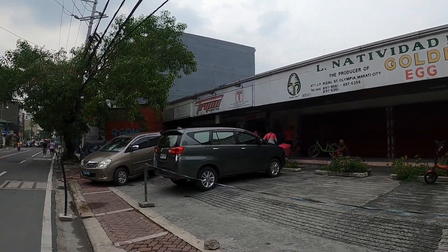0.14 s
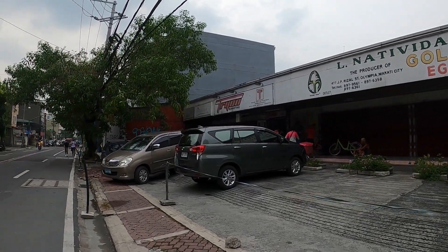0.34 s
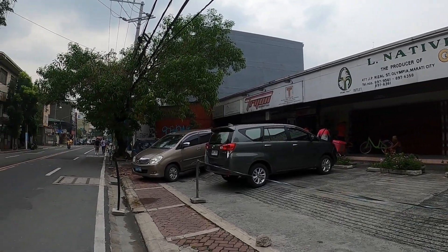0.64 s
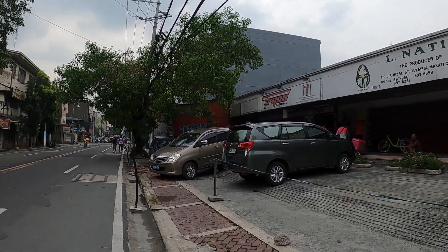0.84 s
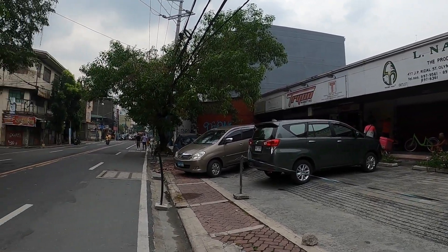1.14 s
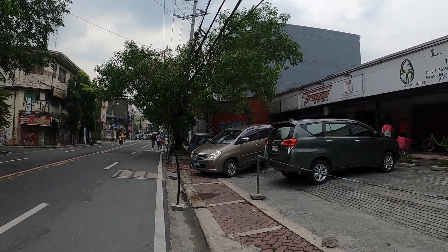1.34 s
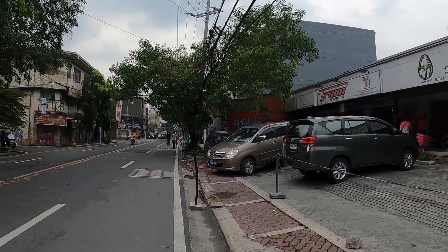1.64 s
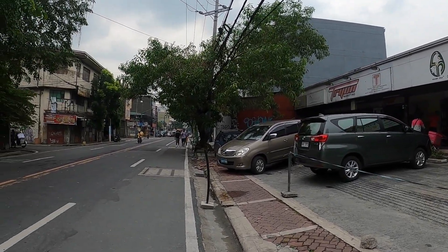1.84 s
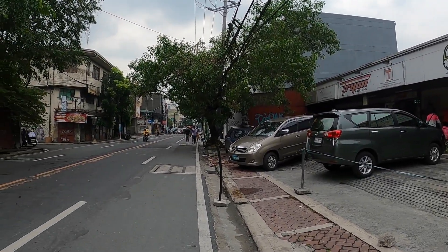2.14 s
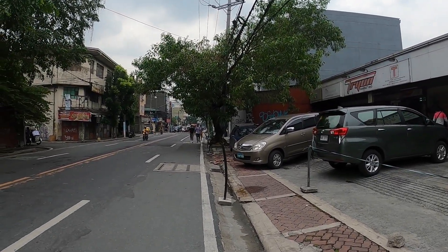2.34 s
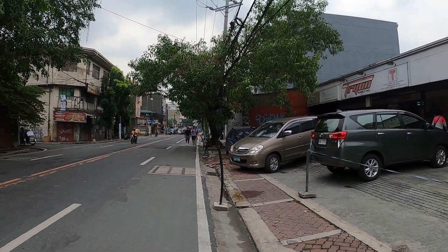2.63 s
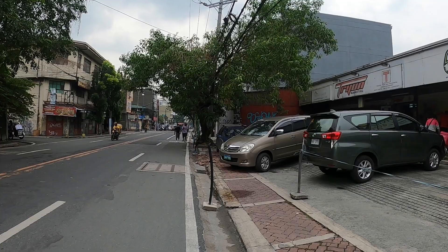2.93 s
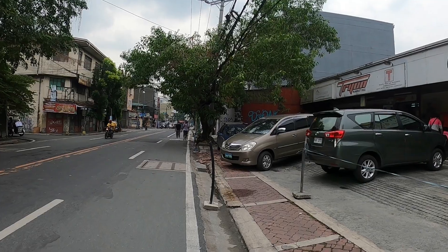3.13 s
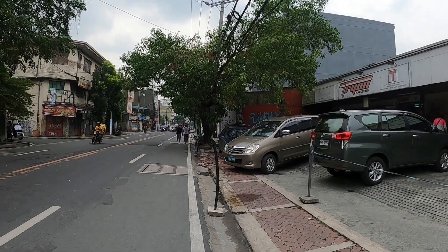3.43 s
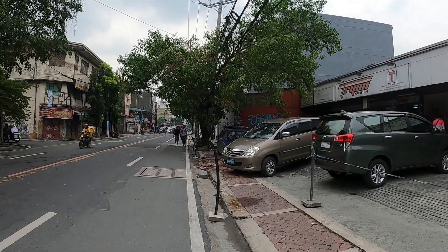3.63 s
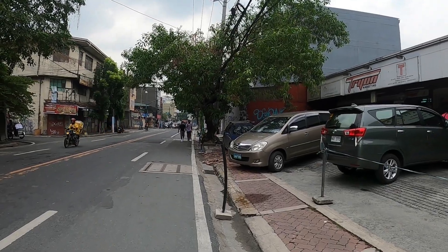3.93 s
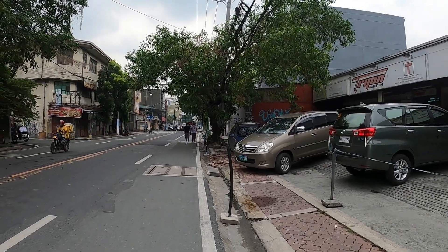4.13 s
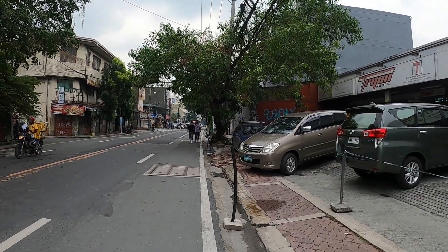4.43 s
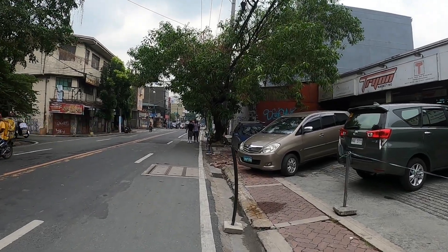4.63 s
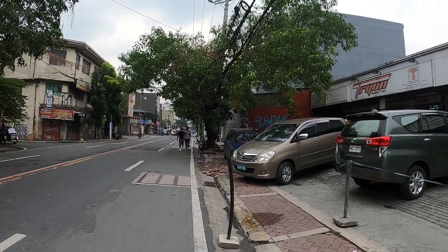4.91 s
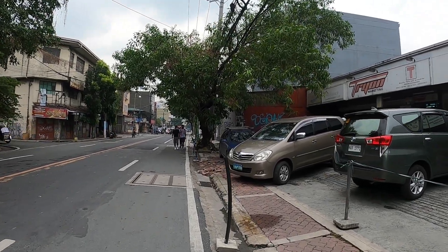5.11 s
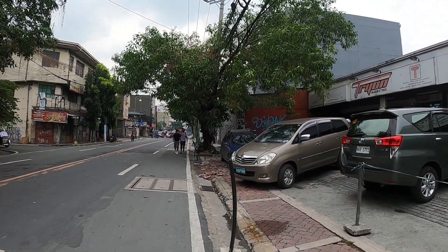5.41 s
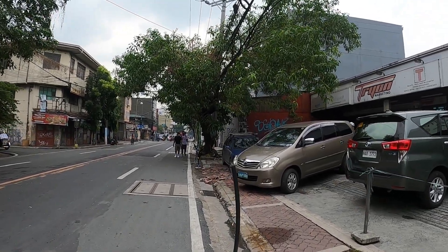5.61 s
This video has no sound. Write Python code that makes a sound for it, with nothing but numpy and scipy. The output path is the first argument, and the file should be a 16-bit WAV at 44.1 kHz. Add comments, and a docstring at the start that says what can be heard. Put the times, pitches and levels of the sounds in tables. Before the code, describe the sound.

Dull handling thumps from a walker's steps over deep low rumble, with faint distant traffic and a thin ticking motorbike hiss on the right.

```python
"""Street walk with a hand-held camera

A walker carries a small camera along a street: each footfall jolts the grip, a sagging swing that thumps
dully in the microphone. Close by lies deep rumble with the drone of the hand on the grip, and far off the
wash of tyres, both shaped noise and alike on both sides. On the right only, a thin high hiss pulses with a
motorbike's firing and swells as it passes, with chain clatter and ringing ticks of loose parts."""
import sys
import numpy as np
from scipy.fft import rfft, irfft, next_fast_len
from scipy.io import wavfile
from scipy.ndimage import uniform_filter1d, map_coordinates

SR = 44100
rng = np.random.default_rng(int(sys.argv[2]) if len(sys.argv) > 2 else 0)


def unload_audio(sound):
    """Save the sound as a 16-bit wav file, at the path given as the first command line argument."""
    columns = np.transpose(np.atleast_2d(sound))
    # keep every value between -1 and 1, then stretch to whole-number steps
    steps = np.round(np.clip(columns, -1, 1) * 32767)
    wavfile.write(sys.argv[1], SR, steps.astype(np.int16))


N = 254192

# Footfall jolts of the grip: t/s of the peak, level/dB of the peak, f/Hz at the peak, rise/cycles,
# level/dB of the arm's recoil against the jolt
JOLTS = [(0.16, -34.5, 168, 0.25, -22), (0.663, -34, 141, 0.47, -14), (0.919, -37.5, 156, 0.38, -17),
         (.955, -40.5, 160, 0.34, 0), (1.158, -44, 131, 0.58, -18), (1.477, -28.5, 160, .33, -12.5),
         (1.899, -20.5, 162, 0.35, -19.5), (1.994, -43.5, 88.5, 0.54, -12), (2.375, -25.5, 124, 0.43, -9.5),
         (2.394, -35, 109, .49, -18), (2.733, -28.5, 164, 0.23, -16), (2.744, -35, 101, .34, -11),
         (3.212, -39.5, 177, 0.18, -22), (3.634, -43.5, 117, 0.37, -3), (3.774, -44.5, 172, 0.46, -17),
         (3.861, -17.5, 163, 0.36, -19), (4.121, -39, 111, .71, -6), (4.133, -26, 186, 0.77, -10),
         (4.151, -27.5, 149, 0.59, -22), (4.554, -27.5, 166, 0.33, -7.5), (4.878, -44, 95, 0.44, -7),
         (5.604, -39, 87, 0.97, -24)]


def amp(db):
    """dB to gain."""
    return 10 ** (np.asarray(db) / 20)


def unit(x):
    """Scaled to rms 1."""
    return x / np.sqrt(np.mean(x ** 2) + 1e-20)


def curves(rows):
    """One value per sample for each column after the time."""
    times, *columns = np.transpose(rows)
    return [np.interp(np.arange(N) / SR, times, column) for column in columns]


def wobble(rate):
    """A smooth random curve, rate knots a second."""
    knots = rng.standard_normal(int(N * rate / SR) + 4)
    return map_coordinates(knots, [np.arange(N) * rate / SR])


def filtered(x, response):
    """x through a response given as a function of frequency in Hz."""
    size = next_fast_len(N + 8192)
    spectrum = rfft(x, size) * response(np.fft.rfftfreq(size, 1 / SR))
    return irfft(spectrum, size)[..., :N]


def coloured(x, spectrum):
    """x through (f/Hz, level/dB) points joined on a log axis, at rms 1."""
    f, db = np.transpose(spectrum)
    return unit(filtered(x, lambda hz: amp(np.interp(np.log(hz + 1), np.log(f + 1), db))))


def traffic():
    """Far tyres: a smooth roar and hiss, two bands of noise with slight random swells."""
    # Far tyres over time: t/s, roar level/dB, hiss level/dB
    tyre_levels = [(0.0, -67.5, -73.5), (1.8, -68.5, -74), (2.9, -68.5, -74.5), (3.5, -68.5, -74),
                   (4.4, -69, -74.5), (5.1, -68.5, -72.5), (5.76, -68, -73)]
    # Colour of the tyre roar: f/Hz, relative level/dB per Hz
    roar_colour = [(180, -37), (300, 0), (387, -4.5), (408, -5), (507, -6.5), (1550, -15), (1800, -23),
                   (2340, -40.5), (3960, -120)]
    # Colour of the tyre hiss: f/Hz, relative level/dB per Hz
    hiss_colour = [(1000, -32), (1700, 1), (2300, 0.5), (3000, 1), (4300, -4.5), (4900, -5.5),
                   (5500, -10.5), (7300, -17.5), (8000, -23), (10500, -24.5), (12000, -18), (14000, -26.5),
                   (16000, -32.5)]
    roar_db, hiss_db = curves(tyre_levels)
    roar = coloured(amp(0.8 * wobble(8.3)) * rng.standard_normal(N), roar_colour)
    hiss = coloured(amp(0.35 * wobble(4.9)) * rng.standard_normal(N), hiss_colour)
    return amp(roar_db) * roar + amp(hiss_db) * hiss


def rumble():
    """Deep lumpy rumble; above it the drone of the hand on the grip, which each jolt stirs."""
    # Deep rumble over time: t/s, level/dB
    rumble_level = [(0, -43), (.09, -46.5), (.19, -43), (.3, -45), (.9, -47), (1.35, -45.5), (1.6, -46),
                    (1.9, -41), (2.2, -50.5), (2.5, -47), (2.9, -47.5), (3.3, -47), (3.6, -44.5),
                    (4.0, -47.5), (4.4, -46), (4.7, -50.5), (5.0, -45), (5.3, -47.5), (5.6, -39.5),
                    (5.68, -48), (5.76, -35.5)]
    # Colour of the deep rumble, before evening out: f/Hz, relative level/dB per Hz
    deep_colour = [(8.8, -34), (15, 1.5), (32, 2), (48, -0.5), (58, -6), (86, -15), (110, -20.5),
                   (140, -45), (240, -120)]
    # Colour of the grip drone: f/Hz, relative level/dB per Hz
    drone_colour = [(35, -19.5), (60, 3.5), (81, -19.5), (156, -8), (199, -16.5), (237, -17), (404, -34),
                    (434, -31), (500, -36), (650, -65), (1100, -120)]
    lumps_db, lumps_per_s = 2.5, 11  # chance swells
    drone_db, sway_db = -57, 0.5  # the hand on the grip
    shake_db, shake_s = -29.5, 0.015  # stirred drone: level against the jolt's peak, time to the strongest

    deep_db, = curves(rumble_level)
    deep = coloured(rng.standard_normal(N), deep_colour)
    power = np.abs(uniform_filter1d(deep ** 2, int(0.06 * SR)))
    steady = deep / np.sqrt(power + 0.048)  # lumps of even size
    steady = coloured(steady, [(8, -41), (14, -0.5), (110, 1.5), (200, -26.0)])
    deep = unit(amp(lumps_db * wobble(lumps_per_s)) * steady)

    sway = amp(1.2 * wobble(20) + sway_db * wobble(7))
    drone = coloured(sway * rng.standard_normal(N), drone_colour)
    shake = np.zeros(N)
    for s, db, *_ in JOLTS:
        since = np.maximum(np.arange(N) / SR - s, 0) / shake_s
        shake += amp(db + shake_db) * since * np.exp(1 - since)
    return amp(deep_db) * deep + (amp(drone_db) + shake) * drone


def motorbike():
    """High hiss pulsing with the firing; chain links clatter over the sprocket and loose parts tick."""
    # The passing motorbike: t/s, level/dB of the hiss, level/dB of its top against the rest
    passing = [(0.0, -72, -0.5), (0.5, -73, 2), (1.15, -74.5, -2), (2.73, -77.5, -1), (3.5, -67.5, -4),
               (4.27, -67, 1), (4.6, -64, 2.5), (4.86, -62, 6), (5.17, -60, 1.5), (5.24, -61, 0.5),
               (5.28, -55.5, -2), (5.33, -57.5, -1.5), (5.76, -67, -3)]
    # Colour of hiss and clatter: f/Hz, relative level/dB per Hz
    sizzle_colour = [(5880, -57), (10000, -34.5), (10700, -28.5), (11600, -3), (12300, 3.5), (13100, 0.5),
                     (15600, -10.5)]
    # Loudest loose-part ticks: t/s, level/dB, f/Hz
    loud_ticks = [(3.5306, -54.5, 12700), (4.1198, -56, 12400), (4.5852, -46, 13300), (4.8631, -50, 12400),
                  (4.9714, -50, 13500), (5.141, -52.5, 12400), (5.1874, -43, 12700), (5.221, -38.5, 12500),
                  (5.266, -42, 12200), (5.3495, -44.5, 12800)]
    chain_hz, firing_hz = 179.5, 24
    clatter_share = 0.24  # of the power
    tick_db, tick_spread_db, tick_hz = 2, 3.5, 12280  # small ticks near the firings, against the hiss

    level_db, top_db = curves(passing)
    t = np.arange(N) / SR
    pulse = np.cos(2 * np.pi * firing_hz * t + 0.7 * wobble(3))
    firing = amp(1.2 * pulse + 0.69 * wobble(41))
    hiss = coloured(firing * rng.standard_normal(N), sizzle_colour)

    links = np.diff(np.floor(chain_hz * t + 0.22 * wobble(60)), prepend=0) > 0
    alternate = np.floor(chain_hz * t) % 2  # every other link strikes harder
    strikes = links * amp(rng.uniform(-5, 4.8, N) + 4 * alternate)
    decay = amp(-60 * np.arange(400) / SR / 0.009)  # 60 dB in 9 ms
    clatter = np.convolve(strikes, decay)[:N] * rng.standard_normal(N)
    clatter = coloured(clatter, sizzle_colour)

    mix = np.sqrt(1 - clatter_share) * hiss + np.sqrt(clatter_share) * clatter
    top = filtered(mix, lambda hz: 1 / (1 + (13600 / (hz + 1)) ** 24))
    out = amp(level_db) * (mix - top + amp(top_db) * top)  # brighter when the path to it is clear

    small_ticks = []
    for s in np.arange(1, int(N / SR * firing_hz) - 1) / firing_hz:
        late, louder, higher = rng.standard_normal(3)
        db = level_db[round(s * SR)] + tick_db + tick_spread_db * louder
        small_ticks.append((s + 0.003 * late, db, tick_hz * (1 + 0.021 * higher)))
    u = np.arange(300) / SR
    swell = (u / 0.0009) ** 2 * np.exp(2 - 2 * u / 0.00083)
    for s, db, hz in [*loud_ticks, *small_ticks]:
        out[round(s * SR):][:len(u)] += amp(db) * swell * np.sin(2 * np.pi * hz * u)
    return out


def footfalls():
    """Each jolt swings the grip for a cycle or two; the grip slackens, so the pitch sags."""
    # Hard contacts in a step: t/s, level/dB of the peak, f/Hz, cycles to the peak
    contacts = [(0.155, -49.5, 380, 0.56), (0.912, -49, 380, 0.55), (1.8967, -37, 414, 0.95),
                (2.371, -46.5, 378, 0.8), (2.731, -48, 433, 0.65), (2.8875, -48, 600, 0.22),
                (3.209, -53, 370, 0.49), (3.8558, -40, 436, 0.64), (4.133, -45.5, 1000, 0.34),
                (4.175, -55, 450, 0.9), (4.551, -48, 397, .6)]
    fall_cycles = 0.67  # how long a swing takes to die
    sag_most, sag_lost_per_cycle = 0.65, 0.76  # a sharper jolt slackens the grip more
    lead = SR // 20  # samples ahead of the peak
    out = np.zeros(N + SR)
    t = np.arange(-lead, 2 * lead) / SR
    after = np.maximum(t, 0)
    # the arm recoils slowly
    push = (after / 0.0039) * np.exp(1 - after / 0.007) * np.sin(2 * np.pi * 52 * after)
    for s, db, hz, rise, push_db in JOLTS:
        sag = np.clip(sag_most - sag_lost_per_cycle * rise, 0, 1)
        cycles = hz * np.cumsum(1 - sag * np.tanh(t / 0.004)) / SR
        envelope = np.exp(-0.5 * (t * hz / np.where(t < 0, rise, fall_cycles)) ** 2)
        swing = -envelope * np.cos(2 * np.pi * (cycles - cycles[lead]))
        out[round(s * SR):][:len(t)] += amp(db) * (swing + amp(push_db) * push)
    for s, db, hz, turns in contacts:
        u = after * hz / turns  # 1 at the peak
        contact = u ** 2 * np.exp(2 - 2 * u) * np.sin(2 * np.pi * hz * after)
        out[round(s * SR):][:len(t)] += amp(db) * contact
    # the microphone lets little of the slowest motion through
    return filtered(out[lead:][:N], lambda hz: 1j * hz / (18 + 1j * hz))


def scene():
    """All is central but the high hiss with its ticks, which reaches the right port alone."""
    centre = traffic() + rumble() + footfalls()
    return centre + motorbike() * np.array([[0], [1]])


def record(dry):
    """The camera keeps nothing above its band limit."""
    return filtered(dry, lambda hz: hz < 15730)


dry = scene()
out = record(dry)
unload_audio(out)
```